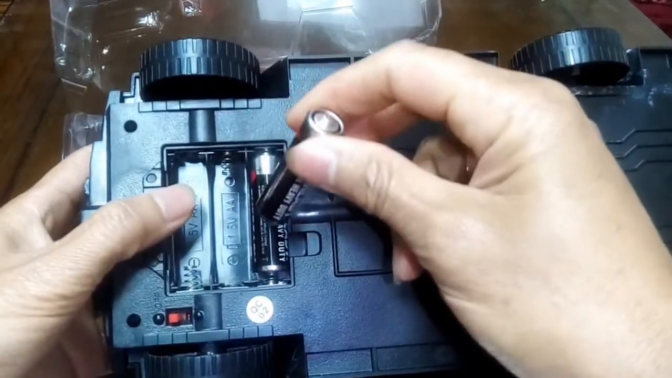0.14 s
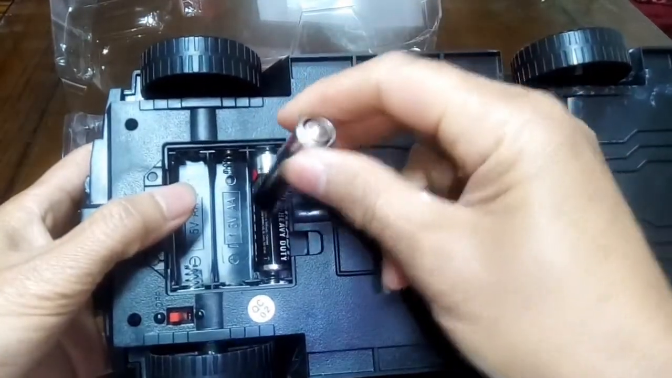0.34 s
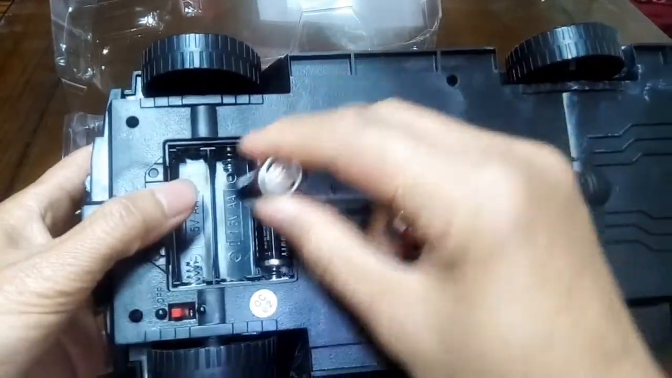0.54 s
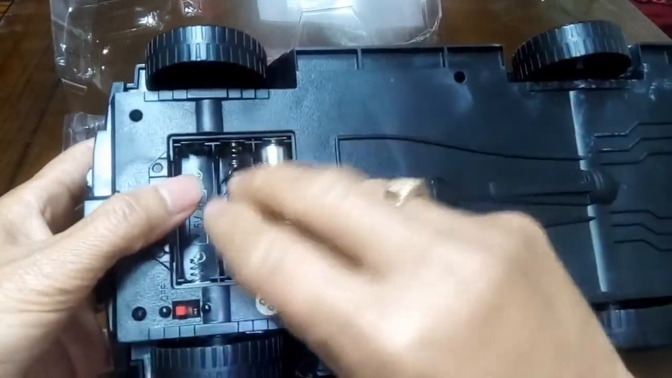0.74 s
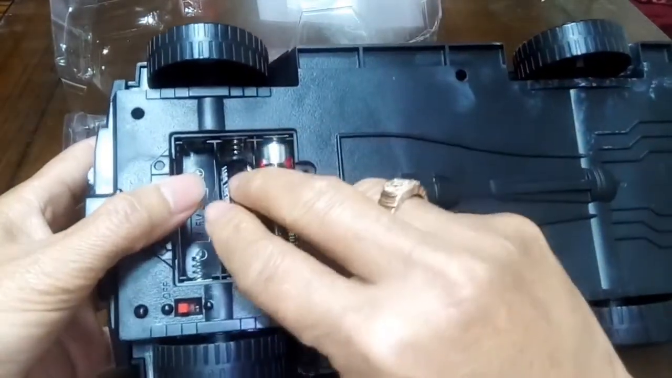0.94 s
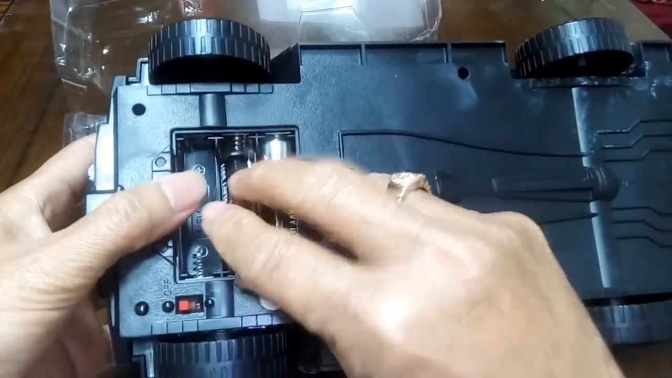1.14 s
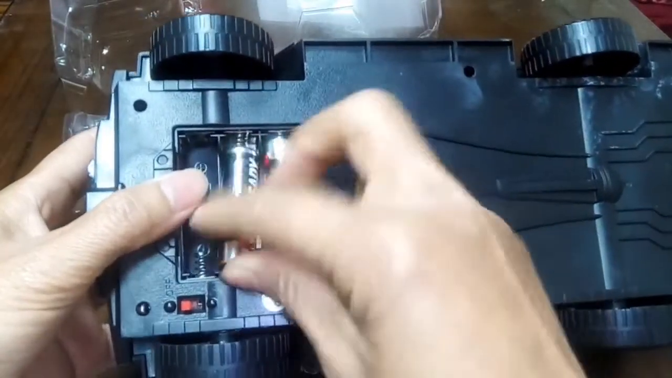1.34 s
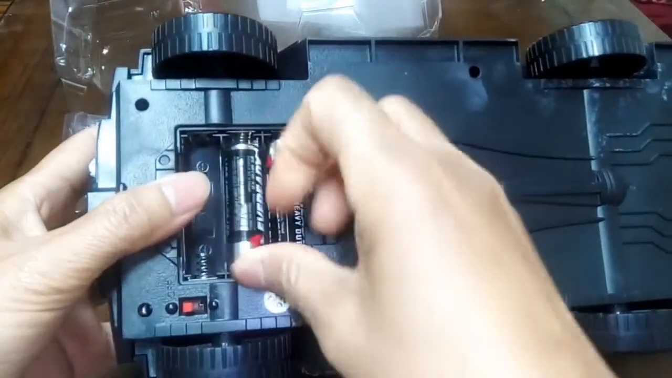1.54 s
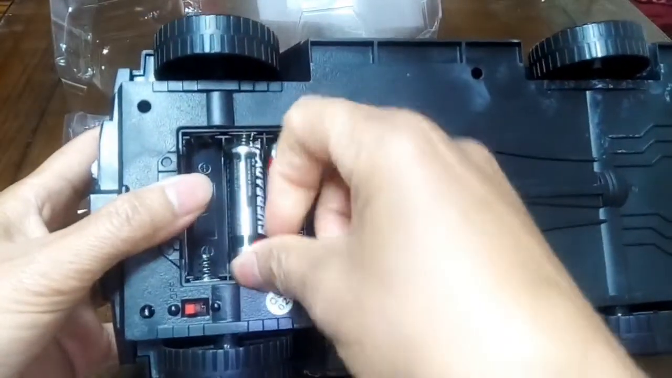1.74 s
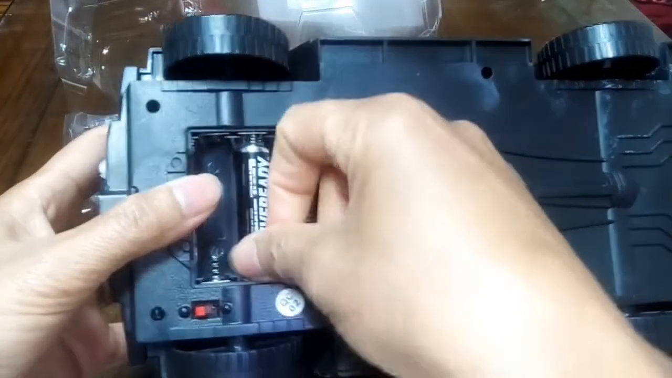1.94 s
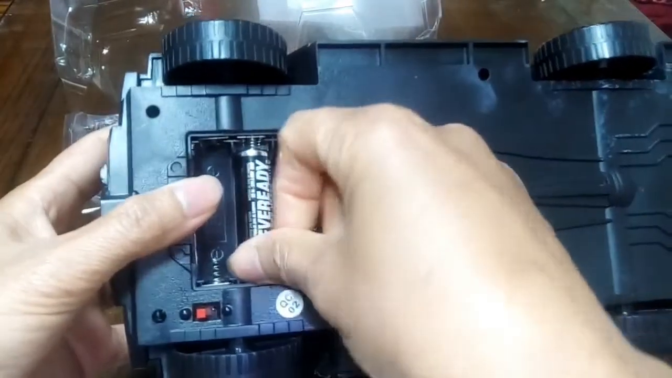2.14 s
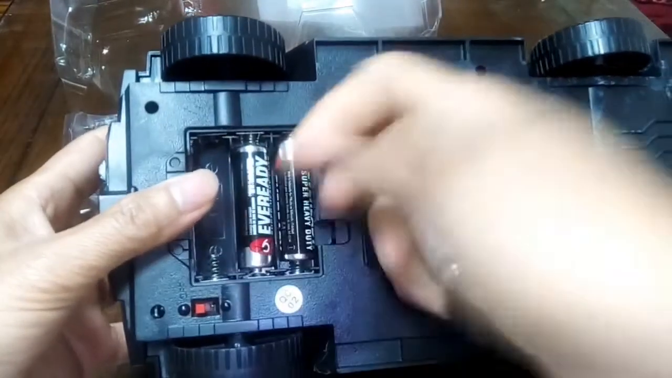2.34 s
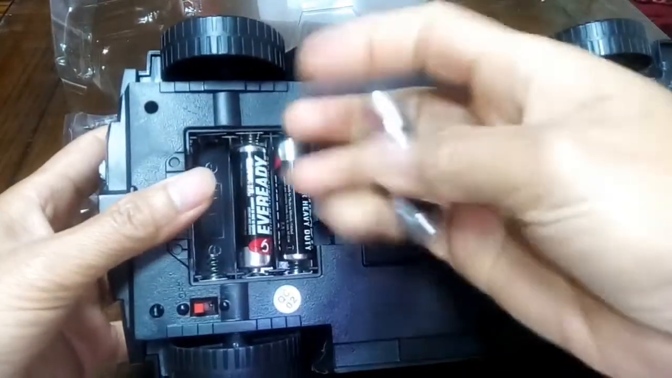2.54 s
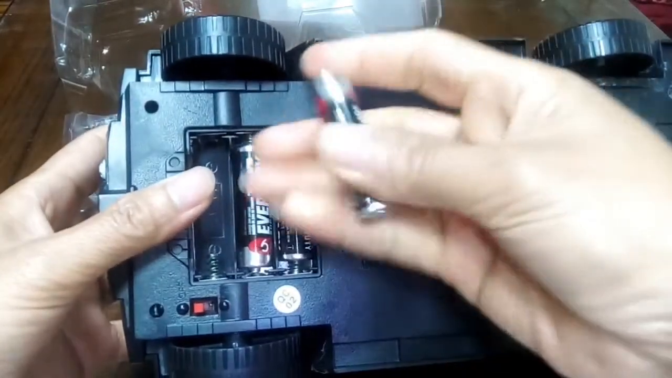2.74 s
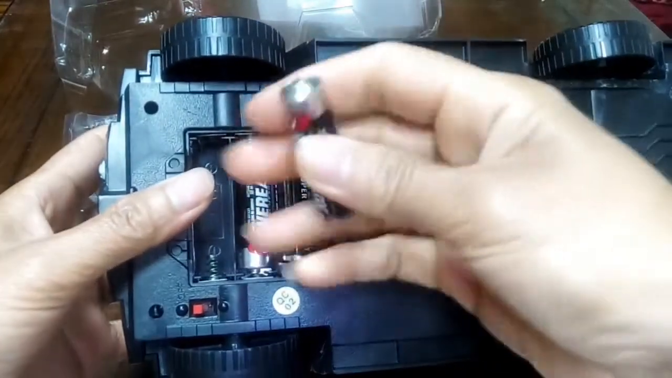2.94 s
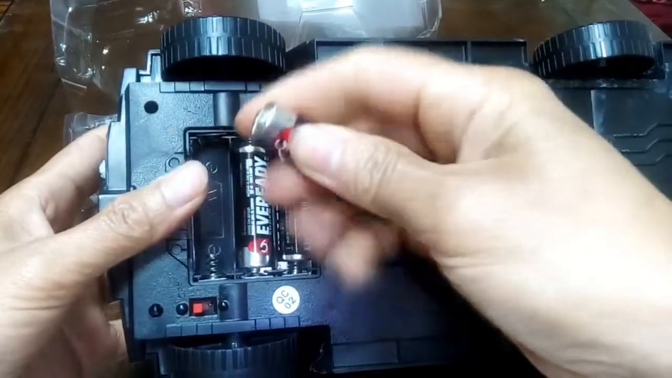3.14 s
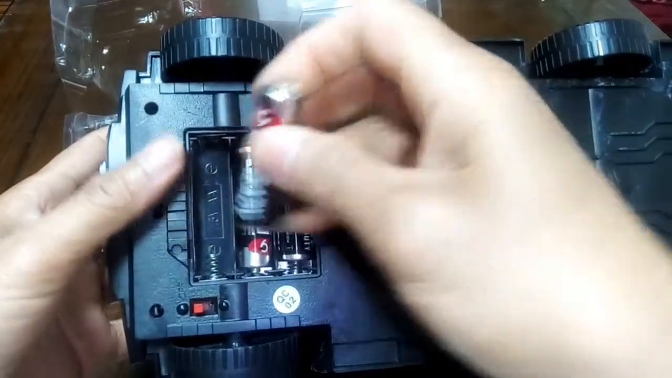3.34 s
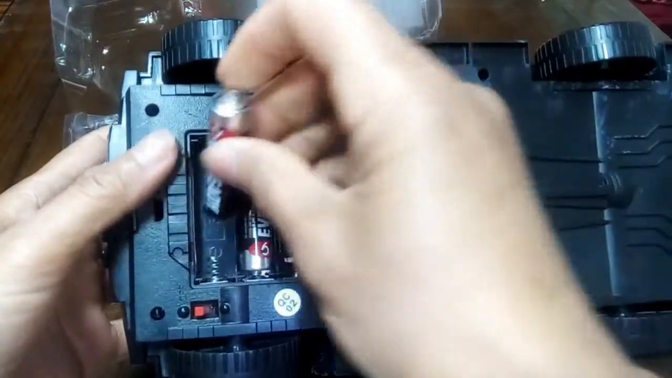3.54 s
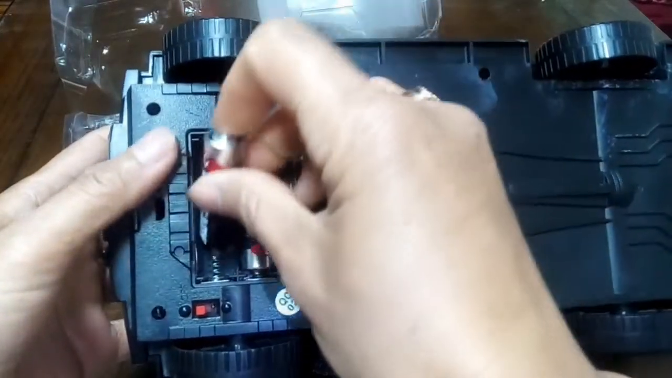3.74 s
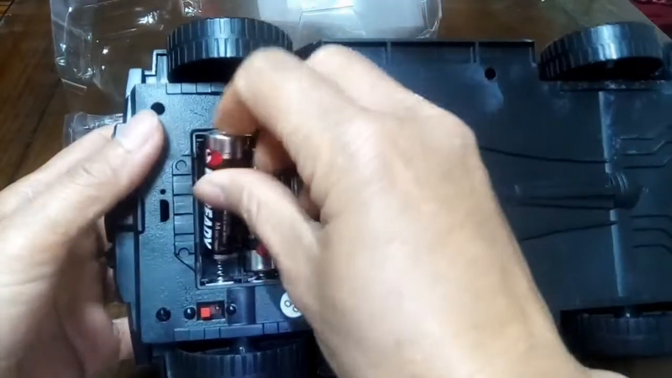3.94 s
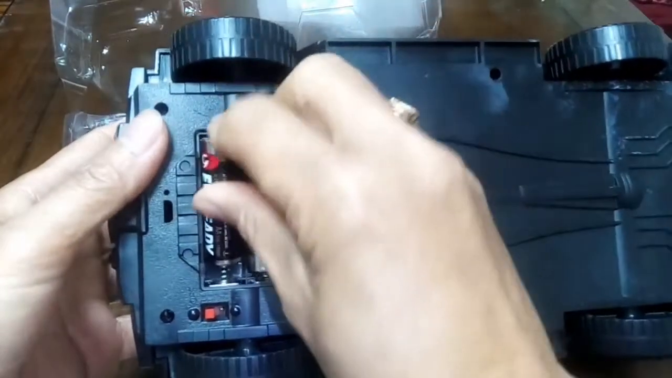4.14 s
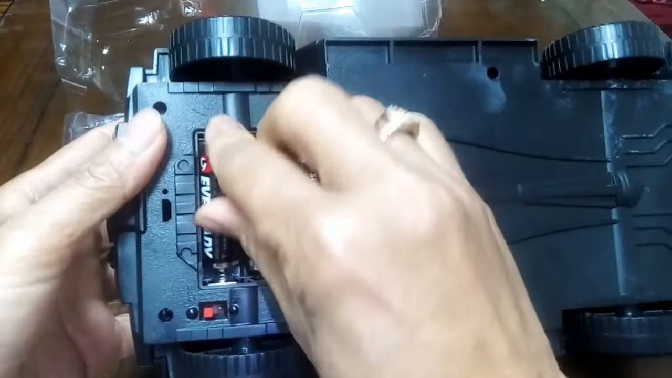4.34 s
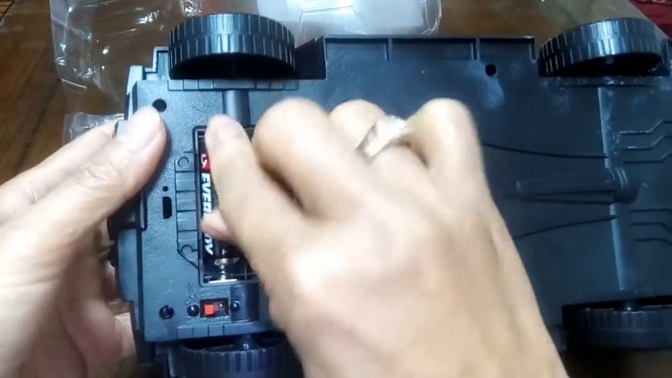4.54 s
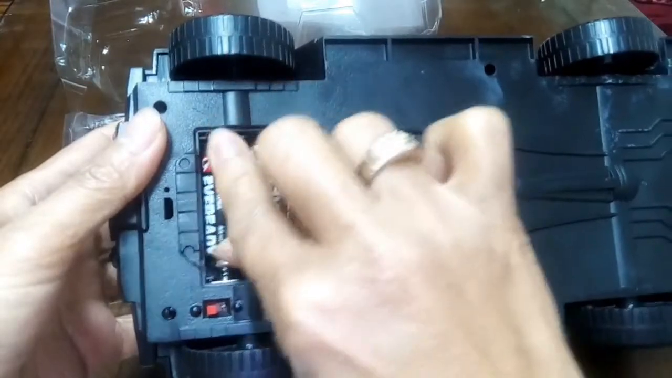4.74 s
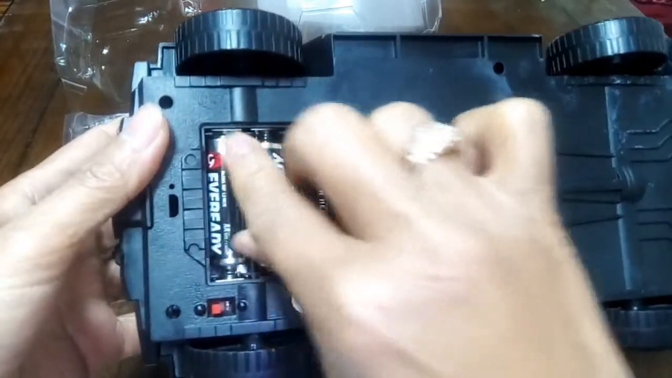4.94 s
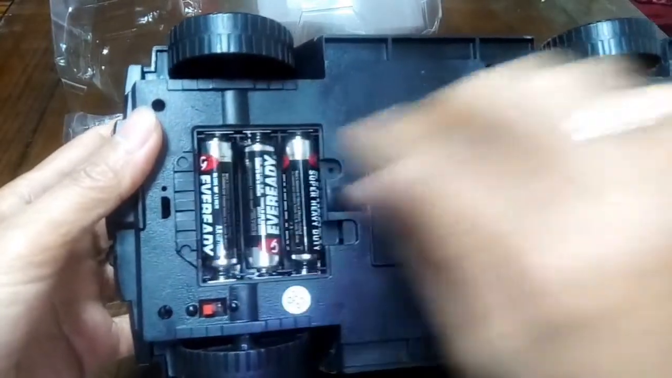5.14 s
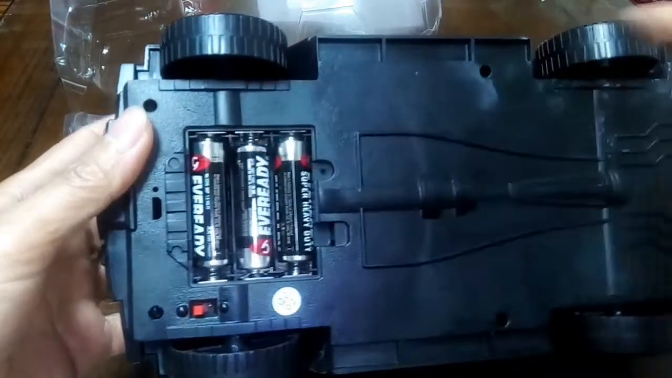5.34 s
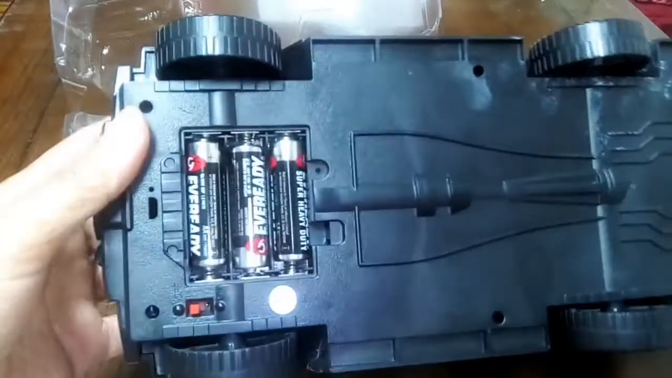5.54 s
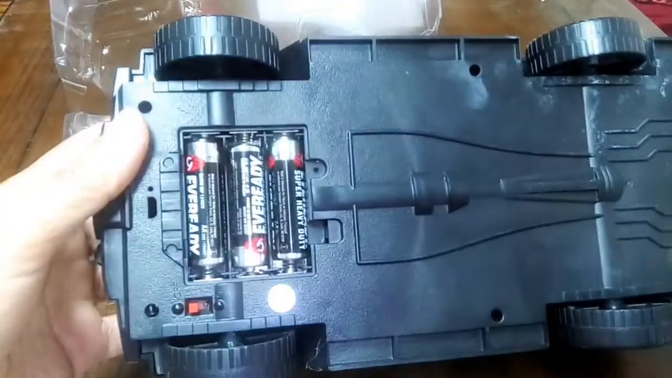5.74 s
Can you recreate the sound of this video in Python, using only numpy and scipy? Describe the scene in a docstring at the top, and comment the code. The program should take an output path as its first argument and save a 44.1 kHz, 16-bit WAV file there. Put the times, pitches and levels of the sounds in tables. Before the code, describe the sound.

Quiet room rumble and hiss. A faint nudge, then a tight cluster of hollow plastic knocks with a tiny metal clink as the first battery goes in. A sharper click with a springy ping follows for the second, then sparse light ticks, a bright ringing spring and finally one loud, dry snap. Close microphone, nearly mono, with a short roomy echo; only background remains at the end.

```python
"""Over quiet room rumble and microphone hiss, a faint nudge, then short hollow cracks close to the microphone:
batteries are pressed one by one into the compartment of an upturned plastic toy car, and the last snaps home.
Each contact is a sharp push with grit, chatter and the shell's dying modes, set to a level in each register.
Steel cans clink (short modes), terminals scrape (noise bursts) and pluck the contact springs (longer modes).
A small room answers with a decaying noise tail; a faint hum and a thin whine lie in the background."""
import sys
import numpy as np
from scipy import signal
from scipy.fft import rfft, irfft
from scipy.io import wavfile

SR = 44100
rng = np.random.default_rng(int(sys.argv[2]) if len(sys.argv) > 2 else 0)


def put_to_file(sound):
    """Save the sound as 16-bit audio at rate SR, in the file named by the first command-line argument."""
    columns = np.atleast_2d(sound).T  # one column per channel
    safe = np.clip(columns, -1, 1)
    whole_steps = np.round(safe * 32767)
    wavfile.write(sys.argv[1], SR, whole_steps.astype(np.int16))


N = 259608
RING_TIME = np.arange(SR // 3) / SR  # time axis of one contact, s
LEVEL_SPAN = round(0.03 * SR)  # contact levels hold for their first 30 ms, in samples
SLIDE_S = 0.002  # sliding time of a middling blow, s

# borders of the registers of a blow, thump, hollow, clack, clink, click, fizz: (border [Hz])
REGISTER_EDGES_HZ = [200, 550, 1300, 2050, 3000, 7000, 14000]


def amp(db):
    """Decibels to gain."""
    return 10 ** (np.asarray(db) / 20)


def read(points, hz):
    """Reads a table along a log-frequency axis."""
    f, value = np.transpose(points)
    return np.interp(np.log(hz + 1), np.log(f + 1), value)


def add(mix, s, sound):
    """Mixes a sound in at time s."""
    part = mix[round(s * SR):][:len(sound)]
    part += sound[:len(part)]


def coloured(x, points, size=4096):
    """Causal minimum-phase filter with the given (frequency [Hz], gain [dB]) curve, so attacks stay sharp."""
    log_gain = np.log(amp(read(points, abs(np.fft.fftfreq(size, 1 / SR)))))
    minimum_phase = np.exp(np.conj(signal.hilbert(log_gain)))
    taps = np.fft.ifft(minimum_phase).real
    return signal.fftconvolve(x, taps[:size // 2])[:len(x)]


def highpassed(x, hz):
    """Second-order high-pass: takes away the sound below hz."""
    return signal.lfilter(*signal.butter(2, hz, "high", fs=SR), x)


def ring(modes, weights, detune, rise_cycles):
    """Dying sines; each needs part of a cycle to build up, so low modes come late."""
    hz, db, t60 = np.transpose(modes)[:, :, None]
    cycles = hz * detune * RING_TIME
    build_up = 1 - np.exp(-cycles / rise_cycles)
    envelope = amp(db - 60 * RING_TIME / t60) * build_up
    return weights @ (envelope * np.sin(2 * np.pi * cycles))


def struck_spot(modes, spot_db):
    """The spot that is struck decides how strongly, and which way, each mode moves."""
    signs = rng.choice([-1, 1], len(modes))
    return signs * amp(spot_db * rng.standard_normal(len(modes)))


def sliding(slide):
    """Envelope of a slide: swells to its peak at the sliding time, then fades."""
    travel = RING_TIME / slide
    return travel * np.exp(1 - travel)


def levelled(sound, db):
    """Sets the rms level of a sound's first 30 ms."""
    return amp(db) * sound / np.sqrt(np.mean(sound[:LEVEL_SPAN] ** 2))


def register_centres():
    """Geometric centre of each register, in Hz."""
    edges = np.array(REGISTER_EDGES_HZ)
    return np.sqrt(edges[1:] * edges[:-1])


def registers(db, contact_hz, weight_db, whole_shell_hz=830):
    """Shares a blow's level among the registers: a soft contact loses the treble, a weighty one gains thump."""
    # how well the shell radiates: (frequency [Hz], gain [dB])
    radiation = [(330, 3), (850, 0.5), (1650, 2), (2500, -0.5), (4600, 2), (9900, -5.5)]
    hz = register_centres()
    softness_db = 10 * np.log10(1 + (hz / contact_hz) ** 4)
    # at low frequencies the shell moves as one, so weight adds its thump there
    thump_db = weight_db / (1 + (hz / whole_shell_hz) ** 2)
    shape = read(radiation, hz) - softness_db + thump_db
    return db + shape - 20 * np.log10(np.linalg.norm(amp(shape)))


def voiced(blow, register_db, size=4096):
    """Gives a blow the weight and brightness of its contact, register by register."""
    edge_bins = np.array(REGISTER_EDGES_HZ) * size // SR
    for _ in range(3):  # the registers overlap in the filter, so approach the levels in steps
        power = 2 * abs(rfft(blow[:LEVEL_SPAN], size)) ** 2 / (LEVEL_SPAN * size)
        own_db = 10 * np.log10(np.add.reduceat(power, edge_bins)[:-1])
        blow = coloured(blow, np.c_[register_centres(), register_db - own_db])
    return blow


def contacts(slide_at_db=-51, slide_halves_db=26.5):
    """Every blow on the shell, cell or fingertip: (time [s], register levels [dB], sliding time [s])."""
    # a cell knocks against the plastic:
    # (time [s], level [dB], hardness as cut-off of the contact [Hz], weight on the whole shell [dB])
    knock_table = [(0.6686, -46, 2400, 19.5), (0.804, -44.5, 1270, 4), (0.8386, -38.5, 1180, -1),
                   (0.955, -57, 900, 4), (0.973, -50, 700, -10), (0.9801, -47.5, 1200, 8),
                   (0.9844, -52.5, 2200, 14), (1.328, -47, 1250, -12), (1.5402, -58.5, 2400, 8),
                   (1.7638, -60.5, 1200, -16), (1.8445, -56.5, 1070, -10), (1.9883, -48, 3600, 4.5),
                   (1.9958, -36, 1740, -7), (3.6626, -58, 1700, -8), (3.668, -51.5, 1600, 3),
                   (3.8431, -55, 1200, 5.5), (3.848, -55, 1000, 14), (4.0057, -60.5, 1400, 4),
                   (4.104, -60, 2500, 11), (4.124, -46.5, 2100, -43), (4.2037, -49, 1260, -21.5),
                   (4.334, -56.5, 1400, 10), (4.543, -62, 2000, 2), (4.69, -52, 1700, -10),
                   (4.6981, -27.5, 1450, -21)]
    # the hands nudge the toy: (time [s], level [dB])
    bump_table = [(0.4852, -64), (1.184, -60.5), (1.2693, -55), (1.673, -62), (3.25, -54.5)]
    # a fingertip is soft and moves the whole shell
    bump_hz, bump_weight_db = 750, 12
    blows = list(knock_table) + [(s, db, bump_hz, bump_weight_db) for s, db in bump_table]
    events = []
    for s, db, hz, weight_db in blows:
        # stronger blows are quicker: the sliding time halves every slide_halves_db
        slide = SLIDE_S * 0.5 ** ((db - slide_at_db) / slide_halves_db)
        events.append((s, registers(db, hz, weight_db), slide))
    return events


def knocks(chatter_db=-25, shell_db=-29, chatter_t60=0.016, buzz_db=-37, buzz_t60=0.07, grit_db=-11, grit_hz=3400,
           push_hz=3400, spot_db=3.7, spread=0.0097, small_body_hz=240, snap=0.76):
    """Each contact: one sharp push, grit while the cell slides, a brief chatter in its bay, and the ringing shell."""
    # modes of the plastic shell, before each blow's slight detuning:
    # (frequency [Hz], relative level [dB], decay t60 [s])
    shell_modes = [(322, -12, 0.17), (374, 0.5, 0.058), (420.7, 1.5, 0.1), (469.5, -11, 0.25),
                   (550, -4.5, 0.1), (604, -5.5, 0.06), (801, -1, 0.047), (902, 1, 0.069),
                   (1017, -1, 0.087), (1166, -14, 0.21), (1332, -3.5, 0.066), (1565, -7, 0.047),
                   (1695, 5, 0.046), (1930, -17, 0.023), (2600, -7, 0.021), (2980, -2, 0.027),
                   (3940, -17, 0.0093), (4160, 13, .015), (6260, 8, 0.023), (6300, 9, 0.062)]
    # colour of the crack at the point of contact, before voicing: (frequency [Hz], gain [dB])
    crack_colour = [(100, -46), (230, -27), (380, -10.5), (550, -12), (750, -7), (1150, -5), (1650, 4),
                    (2200, 9), (3000, -16.5), (4200, -8), (6400, -11), (8200, -20), (15000, -38)]
    out = np.zeros(N)
    push = signal.lfilter(*signal.butter(2, push_hz, fs=SR), signal.unit_impulse(len(RING_TIME)))
    # the cell bounces for a moment; loose plastic parts buzz a little longer
    chatter = amp(chatter_db - 60 * RING_TIME / chatter_t60) + amp(buzz_db - 60 * RING_TIME / buzz_t60)
    for s, register_db, slide in contacts():
        bounces, grains = rng.standard_normal((2, len(RING_TIME)))
        # metal sliding on plastic fizzes while the contact moves
        grit = highpassed(grains * sliding(slide), grit_hz)
        weights = struck_spot(shell_modes, spot_db)
        shell = ring(shell_modes, weights, 1 + spread * rng.standard_normal(), rise_cycles=0.4)
        # the quicker the blow, the more of it goes into the first push
        first_push = (SLIDE_S / slide) ** snap * push
        crack = coloured(first_push + chatter * bounces + amp(grit_db) * grit, crack_colour)
        blow = crack + amp(shell_db) * shell / np.sqrt(len(shell_modes))
        # so small a body radiates little bass
        add(out, s, voiced(highpassed(blow, small_body_hz), register_db))
    return out


def clinks(spot_db=2, spread=0.013):
    """A cell's can rings briefly, a little differently wherever it is held and struck."""
    # a steel can clinks against metal: (time [s], level [dB])
    clink_table = [(0.8388, -42.5), (0.955, -64), (0.973, -57.5), (0.9801, -54.5), (1.303, -68),
                   (1.7638, -51.5), (1.996, -43.5), (3.668, -69), (3.8431, -64), (4.1243, -44.5),
                   (4.543, -66), (4.6985, -61)]
    # modes of the can damped by the fingers, before each clink's slight detuning:
    # (frequency [Hz], relative level [dB], decay t60 [s])
    can_modes = [(2157, -0.5, 0.036), (2347, 4, 0.019), (2464, -3, 0.042), (2814, -4.5, 0.028),
                 (3410, -12, 0.027), (3790, -13.5, 0.034), (4150, -14, 0.037)]
    out = np.zeros(N)
    for s, db in clink_table:
        weights = struck_spot(can_modes, spot_db)
        can = ring(can_modes, weights, 1 + spread * rng.standard_normal(), rise_cycles=0.62)
        add(out, s, levelled(can, db))
    return out


def scrapes(uneven_db=4):
    """A terminal drags over its contact in a short run of tiny, uneven slips."""
    # a terminal scrapes: (time [s], level [dB], sliding time [s])
    scrape_table = [(0.665, -64.5, 0.0019), (0.8386, -55, 0.00079), (0.9835, -59.5, 0.0014),
                    (1.7612, -55, 0.0041), (1.997, -57, 0.00083), (3.6626, -69, 0.001),
                    (4.1225, -57.5, 0.002), (4.687, -55.5, 0.0032), (4.6981, -51, 0.0024)]
    # steel scraping on steel: (frequency [Hz], gain [dB])
    scrape_colour = [(300, -37), (1500, -3), (3000, -4.5), (4500, -1), (6400, 0.5), (8200, -10.5),
                     (10500, -14), (15000, -25)]
    out = np.zeros(N)
    for s, db, slide in scrape_table:
        slips, sizes = rng.standard_normal((2, len(RING_TIME)))
        drag = slips * amp(uneven_db * sizes) * sliding(slide)
        add(out, s, levelled(coloured(drag, scrape_colour), db))
    return out


def springs(stop_t60=0.073, tuning=0.99):
    """A cell slips off a contact spring, which rings until it is touched again."""
    # one pluck for each spring: (time [s], level [dB], time until the battery stops it [s])
    pluck_table = [(0.8388, -45.5, 0.055), (1.7644, -38.5, 0.082), (4.1242, -33.5, 0.18)]
    # modes of the three springs, before tuning: (frequency [Hz], relative level [dB], decay t60 [s])
    spring_modes = [
        [(2180, -8, 0.27), (2420, -6, 0.37), (2850, -2, 0.15), (2950, -10, 0.27), (5200, -19, 0.13),
         (5900, -17, 0.087)],
        [(2100, 1, 0.3), (2150, -11, .06), (3000, -18, .15), (3990, -16, 0.44), (5389, -23, 0.12),
         (6700, -18, 0.1)],
        [(1750, -2, 0.086), (2070, -16, 0.19), (2433, -9, 0.087), (3370, -8.5, 0.098), (3440, -17, 0.2),
         (3630, -21, 0.2), (4000, -18, 0.12), (4400, -16, 0.092), (6240, -39, 0.18)],
    ]
    out = np.zeros(N)
    for (s, db, free), modes in zip(pluck_table, spring_modes):
        stopped = amp(-60 * np.maximum(RING_TIME - free, 0) / stop_t60)
        add(out, s, amp(db) * stopped * ring(modes, np.ones(len(modes)), tuning, rise_cycles=0.91))
    return out


def paired(x):
    """Near sounds are almost mono, with a little width in the treble."""
    # stereo width of near sounds: (frequency [Hz], side minus mid [dB])
    width = [(100, -42), (2800, -42), (4400, -10), (8000, -7), (15000, -16)]
    side_gain = amp(read(width, np.fft.rfftfreq(N, 1 / SR)))
    side = irfft(1j * rfft(x) * side_gain, N)  # a quarter cycle away from the mid
    return np.array([x + side, x - side])


def radiated(small_body_hz=340):
    """What the room gathers from all sides of the toy: the same blows, with single resonances evened out."""
    out = np.zeros(N)
    push = highpassed(signal.unit_impulse(SR // 20), small_body_hz)
    for s, register_db, _ in contacts():
        add(out, s, voiced(push, register_db))
    return out


def room(x, build_up_s=0.0045):
    """Dense reflections of random sign, each band dying at its own speed."""
    # decay of the room: (frequency [Hz], t60 [s])
    room_t60 = [(200, 0.28), (500, 0.66), (1500, 0.65), (5000, 0.5), (9000, 0.63)]
    # colour of the room: (frequency [Hz], gain [dB])
    room_colour = [(150, -13.5), (280, -0.5), (400, 6), (560, 2), (900, 5), (1500, -2.5), (2200, 3),
                   (3100, 1), (4400, 11), (6400, 11.5), (8200, 6), (14000, -4)]
    hz, t, bands = signal.stft(rng.standard_normal(SR), SR, nperseg=256)
    decay = amp(-60 * t / read(room_t60, hz)[:, None])
    tail = signal.istft(bands * decay, SR, nperseg=256)[1]
    tail *= 1 - np.exp(-(np.arange(len(tail)) / SR / build_up_s) ** 2)
    return signal.fftconvolve(x, coloured(tail / np.linalg.norm(tail), room_colour))[:N]


def background(air_db=-61.5, hum_hz=149.0, hum_db=-83, whine_hz=6449, whine_db=-89, overtone_db=-97):
    """Steady room rumble and microphone hiss, with a faint hum and a thin electrical whine; levels are rms."""
    # spectrum of rumble and hiss: (frequency [Hz], relative density [dB per Hz])
    air_colour = [(25, -15.5), (45, -14), (75, -5.5), (150, 0.0), (400, -3), (800, -6.5), (2000, -11),
                  (3300, -12.5), (4400, -12.5), (6500, -14.5), (8200, -26), (13800, -25.5), (14800, -13.5),
                  (15700, -18)]
    air_gain = amp(read(air_colour, np.fft.rfftfreq(N, 1 / SR)))
    air = irfft(rfft(rng.standard_normal(N)) * air_gain, N)
    t = np.arange(N) / SR
    lines = [(hum_hz, hum_db), (whine_hz, whine_db), (2 * whine_hz, overtone_db)]
    tones = sum(np.sqrt(2) * amp(db) * np.sin(2 * np.pi * hz * t) for hz, db in lines)
    return amp(air_db) * air / air.std() + tones


def scene(shell_room_db=-13.5, spring_room_db=-19, cell_room_db=-15):
    """The toy close by, its echo in the room, and the background."""
    steel = springs()
    cells = clinks() + scrapes()
    near = paired(knocks() + steel + cells)
    sent = amp(shell_room_db) * radiated() + amp(spring_room_db) * steel + amp(cell_room_db) * cells
    return near + room(sent) + background()


def record(dry, cutoff_hz=15700):
    """The recorder's band limit: a steep low-pass."""
    lowpass = signal.firwin(511, cutoff_hz, window=("kaiser", 9), fs=SR)
    return signal.oaconvolve(dry, lowpass[None], "same")


dry = scene()
out = record(dry)
put_to_file(out)
```